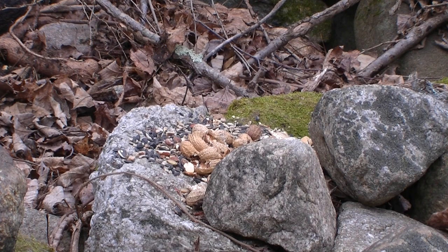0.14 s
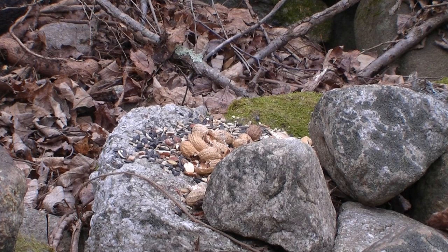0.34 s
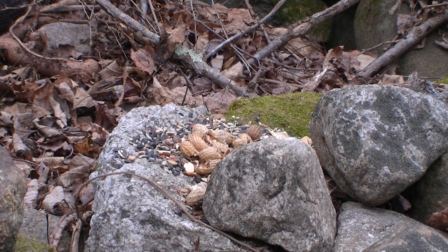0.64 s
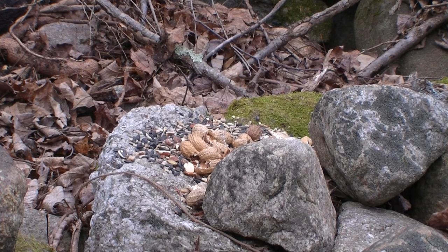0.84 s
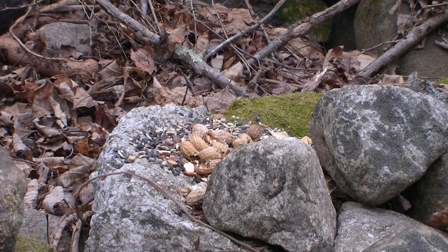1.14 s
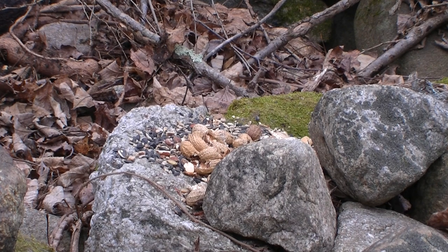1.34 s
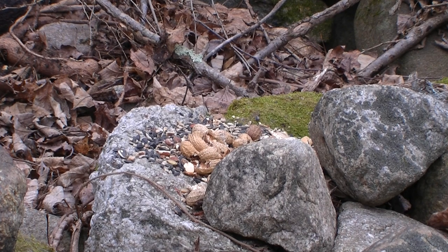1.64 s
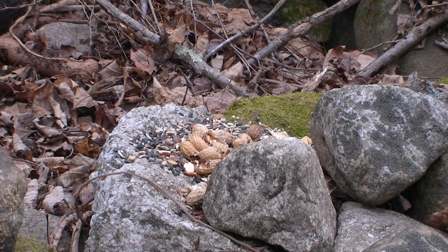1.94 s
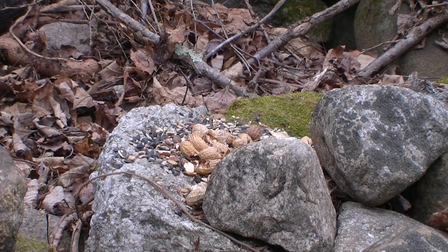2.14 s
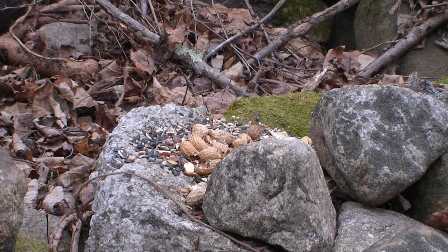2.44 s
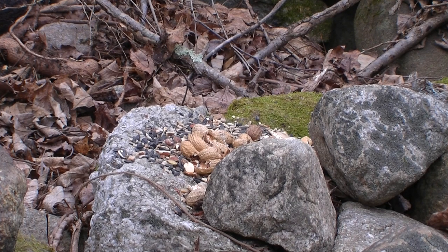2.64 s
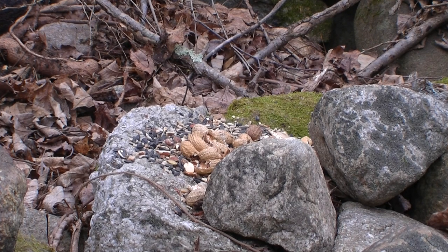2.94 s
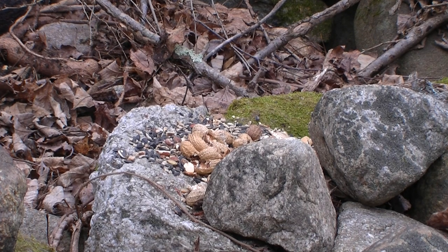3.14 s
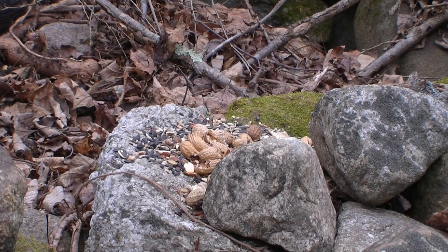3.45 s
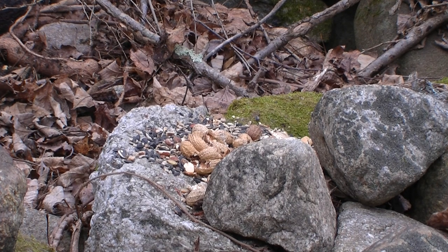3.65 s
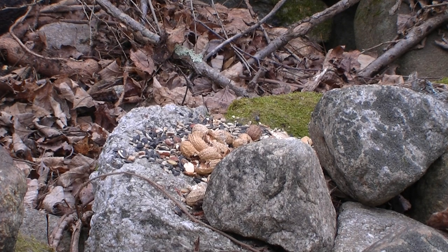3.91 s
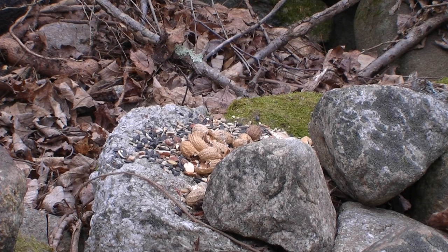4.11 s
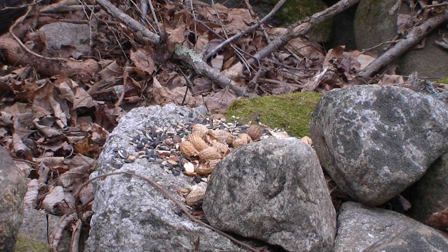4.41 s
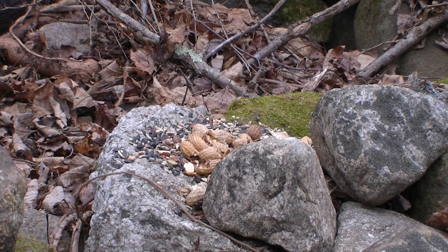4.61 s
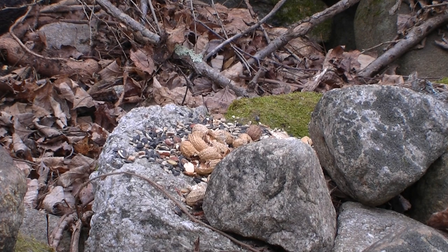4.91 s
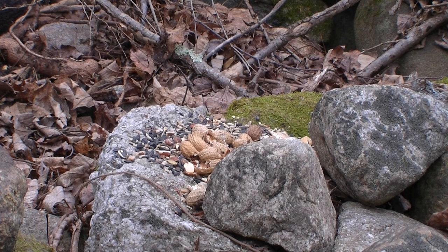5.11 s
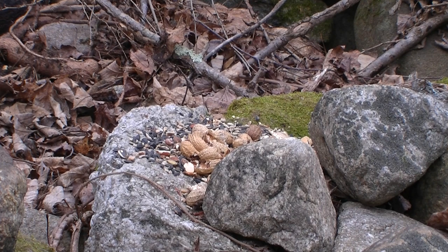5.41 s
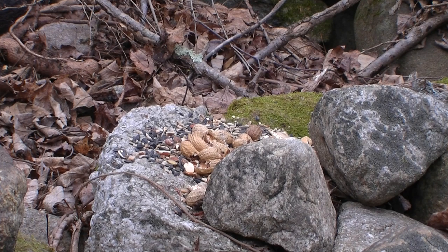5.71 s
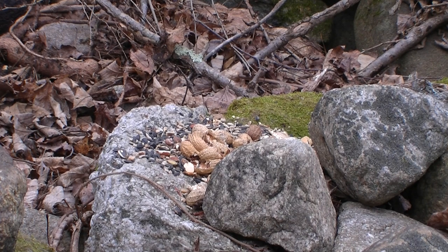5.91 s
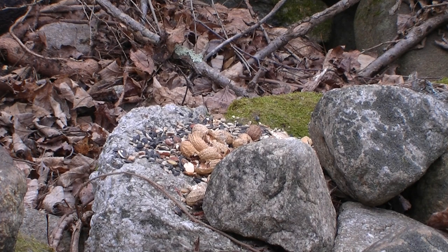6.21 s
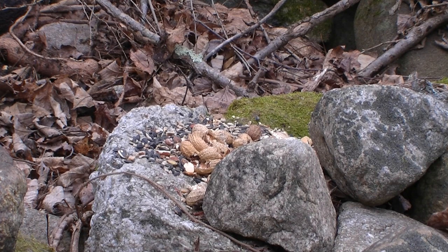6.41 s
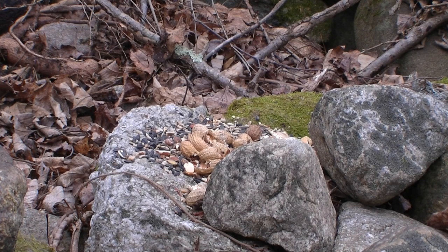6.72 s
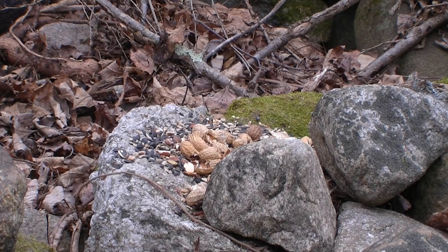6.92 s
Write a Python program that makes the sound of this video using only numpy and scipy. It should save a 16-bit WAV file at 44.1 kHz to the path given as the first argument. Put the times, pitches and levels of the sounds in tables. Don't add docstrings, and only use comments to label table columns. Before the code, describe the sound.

A quiet wood, heard in stereo from a few metres away. From 0 to 0.6 seconds small birds flap hard in dry leaves: sharp crackling wing claps, soft low puffs, snapping leaves and feather sweeps. It eases to light rustling, then flurries again from 1.2 to 1.6 and thickly from 1.9 to 2.6 seconds, with a strong clap near 1.87. Activity thins, with small snaps around 3.2, a loud sharp clap at 3.73 and ticks and knocks near 4. A near lull follows, with a barely audible thin falling bird call around 4.9. Wings and leaves stir again from 5.2 to 5.9, strongest near 5.6; a second, clearer distant call glides down around 5.9 to 6. Then only sparse rustles and tiny ticks until 7. Soft far traffic and faint engines rising in pitch run throughout.

```python
import sys
import numpy as np
from scipy import signal
from scipy.fft import rfft, irfft
from scipy.io import wavfile
from scipy.ndimage import uniform_filter1d

SR = 44100
rng = np.random.default_rng(int(sys.argv[2]) if len(sys.argv) > 2 else 0)


def voltage_ratio(level):
    return 10 ** (np.asarray(level, float) / 20)


def persist_wave(psi):
    counts = np.round(np.clip(psi, -1, 1) * 32767).astype(np.int16)
    wavfile.write(sys.argv[1], SR, np.atleast_2d(counts).T)


N = 311345
HZ = np.arange(N // 2 + 1) * SR / N
GRAIN, LEAD = 4096, 1024


def level(x, db):
    return x * voltage_ratio(db) / np.sqrt(np.mean(x ** 2))


def crest(x):
    return np.sqrt(uniform_filter1d(x ** 2, size=64).max())


def along(table):
    hz, value = np.transpose(table)
    return np.interp(np.log(HZ + 20), np.log(hz + 20), value)


def in_time(table):
    s, *columns = np.transpose(table)
    return [np.interp(np.arange(N) / SR, s, column) for column in columns]


def band(x, lo_hz, hi_hz, order=2):
    edges = [lo_hz, min(hi_hz, 0.45 * SR)]
    return signal.sosfilt(signal.butter(order, edges, "bandpass", fs=SR, output="sos"), x)


def walk(rate):
    hold = int(SR / rate)
    steps = np.repeat(rng.standard_normal(N // hold + 1), hold)
    return 1.366 * uniform_filter1d(uniform_filter1d(steps, hold), hold)[:N]


def crackle(shape, spread_db):
    size = np.minimum(rng.exponential(size=shape), 3.5)
    return rng.standard_normal(shape) * voltage_ratio(spread_db * size)


def crisp_over_body(hz):
    return 4.5 - 2.5 * np.log2(hz / 1200) ** 2


def hits():
    # (time of peak [s], level [dB], decay [ms], body [Hz])
    wing_claps = [(0.0086, -25.5, .9, 2230), (0.243, -25.5, 1.4, 4110), (0.2766, -32.5, .7, 2380),
                  (0.3265, -23, 4, 1210), (0.397, -19, 3.4, 3100), (0.417, -28, 3.2, 4600),
                  (0.427, -23, 0.95, 1210), (1.2186, -25, 7.5, 1480), (1.2366, -30, 3.2, 1800),
                  (1.2829, -20, 3.9, 2270), (1.521, -25, 1.4, 1490), (1.8685, -20.5, 0.79, 1190),
                  (2.099, -26, 2.4, 1800), (2.178, -25.5, 2.4, 1970), (2.1893, -24.5, 0.87, 1920),
                  (2.258, -26, 0.45, 4240), (2.3579, -32.5, 0.83, 1830), (2.3917, -18.5, 3.1, 2560),
                  (2.4514, -35, 0.38, 2670), (2.515, -25.5, 0.24, 2600), (2.5845, -24.5, 0.3, 1520),
                  (3.1829, -36.5, 0.92, 2980), (3.273, -37.5, 0.82, 1800), (3.32, -35.5, 3.3, 1720),
                  (3.7344, -17, 1, 2760), (3.7973, -33.5, 3.3, 2400), (3.9913, -28, 2.6, 1860),
                  (5.373, -33.5, 0.59, 1430), (5.8294, -28, .22, 2520), (5.8354, -32.5, 1.1, 2850)]
    # (time of peak [s], level [dB], decay [ms], body [Hz])
    leaf_snaps = [(0.107, -38, 2.6, 1190), (0.209, -37.5, 2.9, 2510), (0.6567, -37.5, 1.7, 2520),
                  (0.7152, -41, 4.8, 1840), (1.2611, -37, .5, 1230), (1.3441, -36.5, 6.9, 1610),
                  (1.3957, -42, 9.5, 1800), (1.4756, -40, 1.4, 1250), (1.789, -40, 16, 1870),
                  (1.9386, -38, 6.1, 1460), (1.9786, -41.5, 7.7, 2300), (2.1432, -33.5, 0.57, 3500),
                  (2.2408, -35, 13, 2240), (2.271, -42, 2.7, 2100), (2.4302, -36.5, 16, 1490),
                  (2.4721, -39, 6.4, 1550), (2.7556, -39.5, 2.7, 1850), (2.817, -35.5, 6.9, 1840),
                  (2.9186, -44, 2.7, 1810), (3.092, -43, 1.3, 1900), (3.3062, -39.5, 5.2, 1280),
                  (4.134, -47, 12, 1710), (5.1686, -44.5, 5.3, 2220), (5.8433, -36, 5.5, 1600),
                  (6.0892, -42.5, 0.39, 2200), (6.4, -48, 2.3, 2230), (6.6275, -48, 5.7, 2500),
                  (6.751, -45, 0.59, 1290)]
    # (time of peak [s], level [dB], swell [ms], decay [ms])
    feather_sweeps = [(0.1493, -32.5, 5.8, 0.71), (0.226, -45, 5.6, 8), (0.355, -30.5, 2.3, 0.5),
                      (0.4347, -37.5, 7.9, 18), (0.4976, -34, 15, 6.4), (0.5459, -26.5, 2.5, 2.6),
                      (0.5787, -34, 3.6, 3.1), (0.591, -38.5, 14, 2.4), (1.3176, -36.5, 4.5, 2.6),
                      (1.4296, -45, 7.2, 5.4), (1.4866, -38.5, 3.7, 12), (1.537, -33, 9.5, 3.1),
                      (1.5507, -38, 8.1, .8), (1.923, -39, 8.2, 2.6), (2.1935, -34, 8.1, 0.53),
                      (2.3375, -33, 2.5, 0.45), (2.4011, -38, 2.6, .4), (2.5434, -26, 2.4, .6),
                      (3.5426, -36.5, 5.7, 2.7), (3.5678, -49, 4.3, 18), (3.9975, -36, 3, 0.55),
                      (5.2837, -26, 3.7, 4.3), (5.3284, -44, 7.4, 10), (5.586, -22.5, 2.8, 3.4)]
    # (time [s], level [dB])
    twig_ticks = [(0.0363, -38), (4.67, -52), (5.205, -50), (1.213, -40), (0.131, -43), (0.603, -39),
                  (3.855, -51), (3.9276, -47), (4.043, -40), (4.074, -41), (5.994, -46), (6.004, -46),
                  (6.138, -51)]
    return ([(s, db, crisp_over_body(hz), 0.42, ms, hz) for s, db, ms, hz in wing_claps]
            + [(s, db, crisp_over_body(hz) - 1.5, 0.66, ms, hz) for s, db, ms, hz in leaf_snaps]
            + [(s, db, 1.3, swell_ms, ms, 1800) for s, db, swell_ms, ms in feather_sweeps]
            + [(s, db, 2, 0.4, 0.47, 2000) for s, db in twig_ticks])


def claps():
    out = np.zeros((2, N + GRAIN))
    t_ms = (np.arange(GRAIN) - LEAD) / SR * 1000
    events = hits()
    breaks = crackle((len(events), 3, GRAIN), spread_db=5.0)
    gusts = rng.standard_normal((len(events), GRAIN))
    for (s, db, crisp_db, swell_ms, decay_ms, hz), swarm, gust in zip(events, breaks, gusts):
        rise = np.exp(np.minimum(t_ms, 0) / max(swell_ms, 0.1))
        fall = np.exp(-t_ms / max(decay_ms, 0.2))
        fall = fall + voltage_ratio(-13.5) * np.exp(-t_ms / (6.2 + 0.87 * decay_ms))
        cracks = swarm * np.where(t_ms < 0, rise, fall)
        body = band(cracks[0], hz / 1.67, hz * 2.15)
        crisp = band(cracks[0] + 0.5 * cracks[1:], 4700, 11840)
        puff = band(gust * np.exp(-np.abs(t_ms - 1.5) / (2.9 + decay_ms)), 340, 1400)
        puff_db = -0.6 * crisp_db + 2.0 * np.log2(max(decay_ms, 0.2)) - 14.5
        parts = ((body, -0.45 * crisp_db), (crisp, 0.54 * crisp_db + 0.21), (puff, puff_db))
        sound = sum(x / crest(x) * voltage_ratio(gain_db) for x, gain_db in parts)
        i = int(s * SR)
        out[:, i:i + GRAIN] += voltage_ratio(db - 2.5) * sound / crest(sound)
    return out[:, LEAD:N + LEAD]


def pops():
    # (time [s], level [dB], resonance [Hz])
    wing_pops = [(0.162, -52, 1140), (0.163, -53, 390), (0.219, -49.5, 710), (0.35, -50, 1110),
                 (0.361, -46, 710), (0.447, -48, 730), (0.589, -47, 750), (0.617, -52, 580),
                 (1.16, -53.5, 450), (1.302, -50, 450), (1.347, -45, 725), (1.419, -45.5, 710),
                 (1.492, -49.5, 470), (1.496, -58, 1000), (1.569, -53, 454), (1.879, -43.5, 770),
                 (2.014, -53.5, 394), (2.074, -56, 714), (2.3, -56, 1150), (2.298, -47.5, 557),
                 (2.505, -53, 540), (2.613, -54, 480), (2.831, -51.5, 503), (3.737, -47, 900),
                 (5.288, -46, 890), (5.297, -56, 650), (5.329, -56.5, 364)]
    # (time [s], level [dB], resonance [Hz])
    shell_knocks = [(1.01, -63, 1530), (1.046, -63, 1840), (3.048, -64, 2090), (3.114, -66, 2010),
                    (3.318, -55, 1710), (3.565, -56.5, 1940), (3.975, -61, 2380), (3.996, -51.5, 2280),
                    (4.014, -63, 1780), (4.314, -67, 2500), (4.332, -59.5, 1800), (5.086, -64, 2450),
                    (5.23, -61, 1910), (5.307, -65, 1350), (5.324, -58, 1370), (5.503, -56.5, 2000),
                    (5.565, -55, 1920), (5.589, -56, 1600), (5.743, -53.5, 1510), (5.91, -58, 1690),
                    (6.478, -64, 1520)]
    pop_ms, knock_ms = 3.9, 6.1
    out = np.zeros(N + GRAIN)
    t_ms = (np.arange(GRAIN) - LEAD) / SR * 1000
    events = [(*pop, pop_ms) for pop in wing_pops] + [(*knock, knock_ms) for knock in shell_knocks]
    for (s, db, hz, ms), noise in zip(events, rng.standard_normal((len(events), GRAIN))):
        breath = band(noise, hz / 1.12 - 90, hz * 1.42 + 160)
        ring = np.sin(2 * np.pi * hz * t_ms / 1000) + 0.66 * breath / breath.std()
        swell = np.exp(-(t_ms / np.where(t_ms < 0, 1.26 * ms, ms)) ** 2)
        i = int(s * SR)
        out[i:i + GRAIN] += voltage_ratio(db + 7.0) * ring * swell
    return out[LEAD:N + LEAD]


def litter(air_db):
    # (time of peak [s], level [dB], settling [s])
    shuffles = [(0.0, -49, 0.026), (0.14, -48, .12), (0.26, -47, 0.17), (0.37, -56, 0.071),
                (0.46, -48, 0.077), (0.58, -43.5, 0.067), (0.94, -50, 0.11), (1.25, -46, 0.16),
                (1.55, -42.5, 0.038), (1.73, -50, 0.071), (1.9, -46.5, 0.16), (2.11, -47.5, 0.14),
                (2.26, -42.5, 0.03), (2.58, -49, 0.14), (2.82, -50.5, 0.07), (3.1, -55, .15),
                (3.31, -51.5, 0.09), (3.56, -50, 0.038), (3.75, -52, 0.084), (3.9, -53.5, 0.042),
                (4.02, -55.5, 0.072), (4.85, -64, 0.056), (5.18, -54, 0.055), (5.3, -52.5, 0.16),
                (5.59, -49.5, 0.084), (5.85, -52, .045), (6.13, -53, 0.064), (6.55, -66, 0.16),
                (6.84, -57, 0.11)]
    t = np.arange(N) / SR
    draught_db = -59.5 + 1.26 * (air_db + 55)
    power = voltage_ratio(2 * draught_db)
    for s, db, settle_s in shuffles:
        rise_s = 0.017 + 0.4 * settle_s
        power = power + voltage_ratio(2 * db) * np.exp(-2 * np.abs(t - s) / np.where(t < s, rise_s, settle_s))
    return 10 * np.log10(power)


def splinters():
    per_s, decay_ms, kick_db = 70, 1.26, 4.5
    when, size = rng.random(N), rng.exponential(size=N)
    kicks = (when < per_s / SR) * voltage_ratio(kick_db) * np.minimum(size, 3)
    return 1 + signal.lfilter([1], [1, -np.exp(-1000 / SR / decay_ms)], kicks)


def stir(rustle_db, air_db):
    # (frequency [Hz], density [dB per Hz])
    litter_colour = [(500, -21), (900, -8), (1500, -4), (2200, -4), (4500, -7), (8000, -6.5), (11500, -5.5),
                     (14000, -13), (15800, -20.5)]
    patches = 1.6 * walk(55) + 1.64 * walk(280) + 20 * np.log10(splinters())
    treble = 1 / (1 + (4500 / (HZ + 1)) ** 4)
    crunch_db = 0.033 * (rustle_db + 48)
    rustle = 0
    for share, apart, db in ((1 - treble, 0.45, crunch_db), (treble, 0.7, 0)):
        shared, left, right = crackle((3, N), spread_db=2.5)
        grains = shared + apart * np.array([left, right])
        grains = grains * voltage_ratio(db + patches + 2.15 * walk(70))
        rustle = rustle + irfft(rfft(grains) * voltage_ratio(along(litter_colour)) * np.sqrt(share), N)
    air = band(crackle(N, spread_db=4.5), 314, 1027) * voltage_ratio(3.7 * walk(40))
    return voltage_ratio(rustle_db) * level(rustle, -0.012) + voltage_ratio(air_db) * level(air, -6)


def scatter(x):
    t60_s, top_hz, tail_db = 0.096, 9300, -14
    t = np.arange(8192) / SR
    tail = crackle((2, 8192), spread_db=5.0) * np.exp(-np.log(1000) * t / t60_s)
    tail = band(tail * (t > 0.0015), 290, top_hz, order=1)
    tail = tail / np.sqrt(np.sum(tail ** 2, axis=1, keepdims=True))
    return voltage_ratio(tail_db) * signal.fftconvolve(x[None], tail, axes=1)[:, :N]


def whistle(table, wobble_hz, rough_db):
    hz, db = in_time(table)
    t = np.arange(N) / SR
    tone = np.sin(2 * np.pi * np.cumsum(hz + wobble_hz * walk(25.48)) / SR)
    sounding = (t >= table[0][0]) * (t <= table[-1][0])
    return np.sqrt(2) * tone * voltage_ratio(db + rough_db * walk(16)) * sounding


def far_calls():
    # (time [s], pitch [Hz], level [dB])
    seeps = [
        [(4.83, 7300, -84), (4.86, 7150, -79), (4.93, 7100, -79), (4.97, 7250, -85)],
        [(5.87, 7500, -75), (5.9, 7250, -71), (5.94, 7030, -71), (6.04, 6980, -79)],
    ]
    return sum(whistle(call, wobble_hz=45, rough_db=3) for call in seeps)


def engines():
    # (start [s], end [s], from [Hz], to [Hz], level [dB])
    pulls = [
        (-.3, .75, 147.7, 166, -71),
        (0.796, 2.35, 148.7, 174, -67),
        (2.0, 4.053, 148, 174.2, -68),
        (2.6, 4.1, 110.4, 122.8, -74),
        (4.802, 7.4, 145.8, 167.8, -72),
        (5.1, 6.2, 110.7, 125, -76),
    ]
    fade_s, fade_db = 0.23, -6
    out = 0
    for start, end, from_hz, to_hz, db in pulls:
        s = np.array([start, start + fade_s, end - fade_s, end])
        hz = np.interp(s, [start, end], [from_hz, to_hz])
        pull = np.transpose([s, hz, db + fade_db * np.array([1, 0, 0, 1])])
        out = out + whistle(pull, wobble_hz=2.6, rough_db=2.2)
    return out


def wood():
    # (frequency [Hz], density [dB per Hz])
    wood_colour = [(12, -70), (20, -55), (42, -26), (58, -27.5), (79, -9.5), (197, -11.5), (292, -13),
                   (326, -11.5), (797, -4.5), (2370, -16), (5030, -22), (7230, -21.5), (15800, -30)]
    # (frequency [Hz], likeness [0 to 1])
    likeness = [(60, 1), (300, 0.033), (1000, 0.28), (2500, 0.03), (15000, 0.073)]
    alike = np.clip(along(likeness), 0, 1)
    noise = rfft(rng.standard_normal((2, N))) * voltage_ratio(along(wood_colour))
    mid, side = noise * np.sqrt([1 + alike, 1 - alike])
    pair = np.array([mid + side, mid - side])
    out, swell = 0, walk(0.23)
    for octave in range(10):
        share = np.clip(1 - np.abs(np.log2(HZ / 31.25 + 1e-9) - octave), 0, 1)
        out = out + irfft(pair * share, N) * voltage_ratio(0.12 * swell + 1.9 * walk(4.9))
    return level(out, -54.5)


def scene():
    # (time [s], level [dB], left minus right [dB])
    wing_air = [(0.0, -55, 0), (0.31, -44, 0.5), (0.45, -42.5, 0), (0.69, -52, -0.5), (0.96, -54.5, 1.5),
                (1.34, -47.5, 0.8), (1.71, -54, 2), (2.34, -46, 1.5), (3.03, -54.5, 1.1), (3.72, -69.5, 1),
                (4.07, -55.5, 3), (4.27, -76, 1), (5.05, -67, 0.0), (5.65, -57, 3), (5.82, -51.5, 1.5),
                (5.96, -59, 2), (6.8, -58.5, 1.1), (7.06, -77, -4)]
    air_db, pan_db = in_time(wing_air)
    birds = claps() + pops() + stir(litter(air_db), air_db)
    near = birds * voltage_ratio(np.array([pan_db, -pan_db]) / 2) + scatter(birds.mean(axis=0))
    return near + wood() + engines() + far_calls()


def top_cut(x):
    return signal.sosfilt(signal.butter(12, 16640, fs=SR, output="sos"), x)


def record(dry):
    # (frequency [Hz], left lead [rad])
    port_phase = [(60, 0.55), (700, 0.53), (2000, 0.46), (4500, 0.38), (8500, 1.37), (15000, 1.54)]
    # (frequency [Hz], left minus right [dB])
    port_tilt = [(60, -2.5), (300, -3), (1000, 1), (3000, 0), (8000, 1.5), (15000, 2)]
    half = voltage_ratio(along(port_tilt) / 2) * np.exp(0.5j * along(port_phase))
    top = np.where(HZ < 15870, 1, voltage_ratio(-40))
    mix = irfft(rfft(dry) * top * np.array([half, 1 / half]), N)
    return top_cut(mix)


dry = scene()
out = record(dry)
persist_wave(out)
```